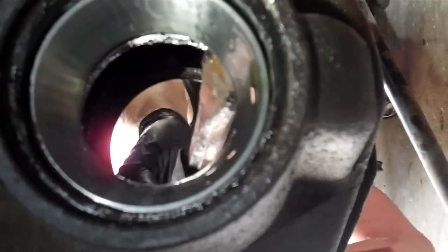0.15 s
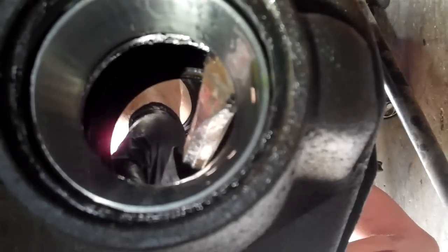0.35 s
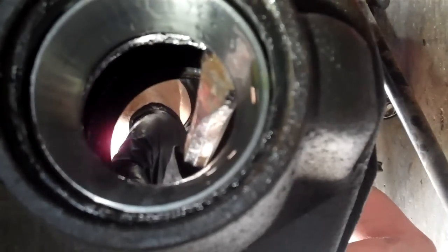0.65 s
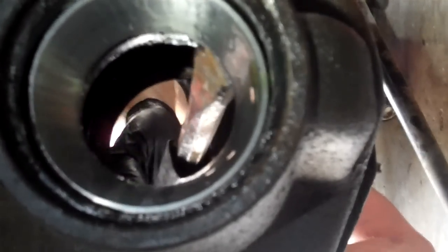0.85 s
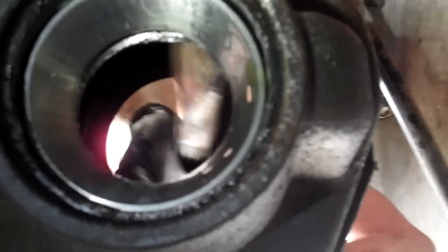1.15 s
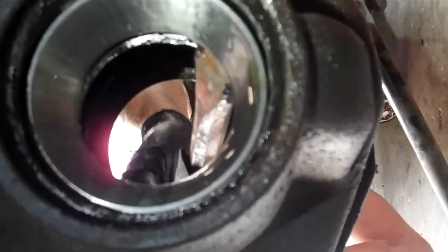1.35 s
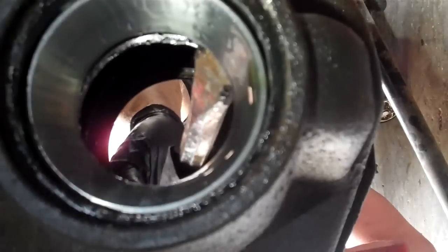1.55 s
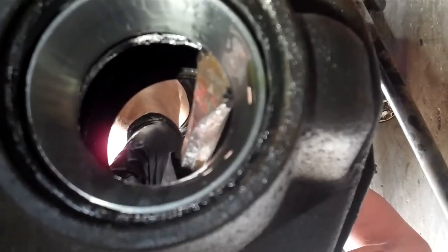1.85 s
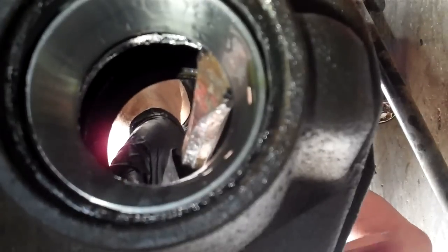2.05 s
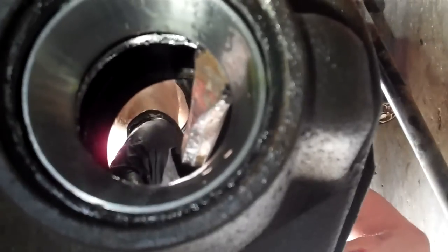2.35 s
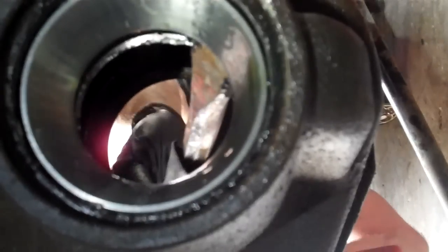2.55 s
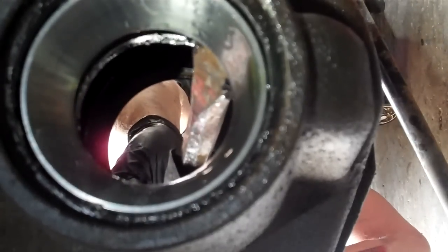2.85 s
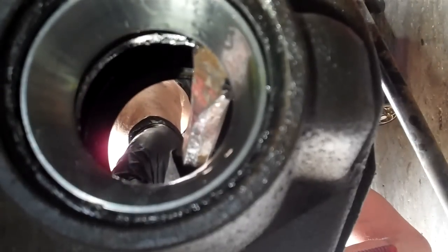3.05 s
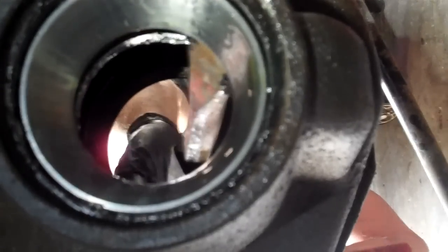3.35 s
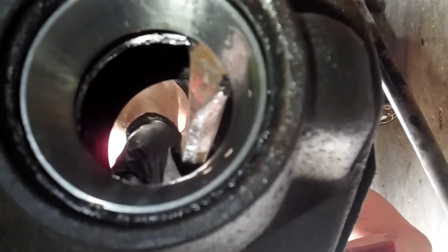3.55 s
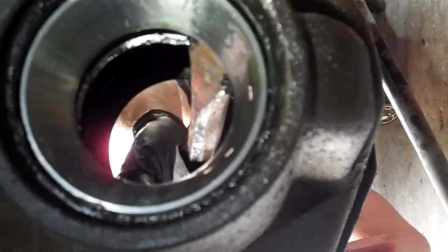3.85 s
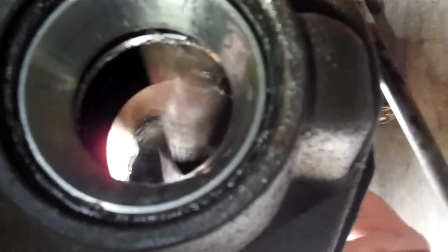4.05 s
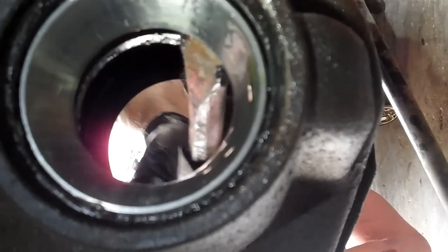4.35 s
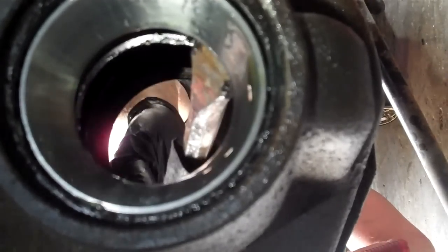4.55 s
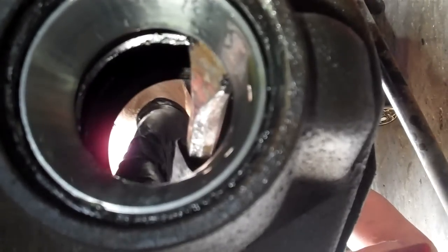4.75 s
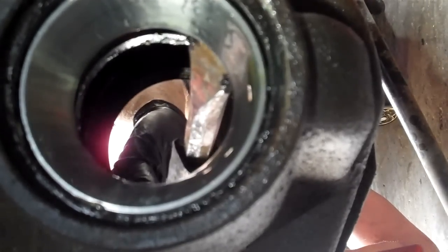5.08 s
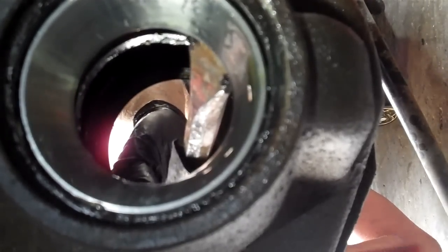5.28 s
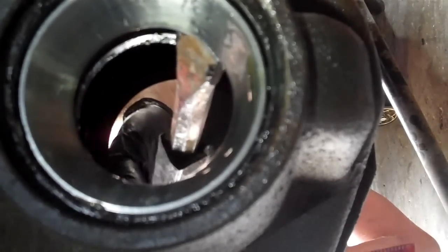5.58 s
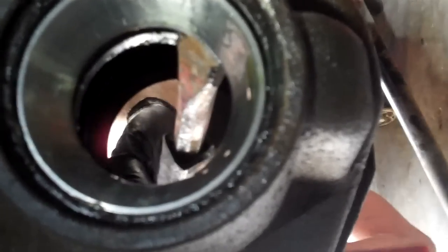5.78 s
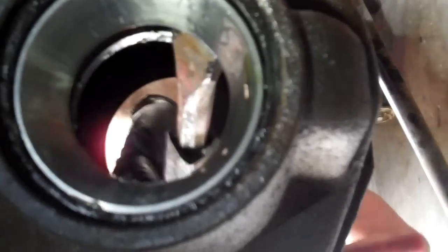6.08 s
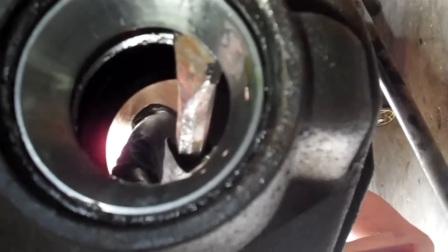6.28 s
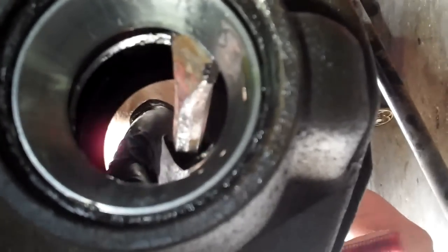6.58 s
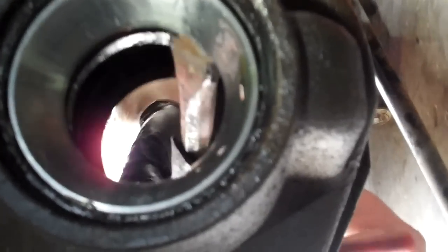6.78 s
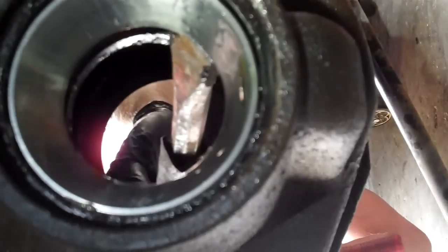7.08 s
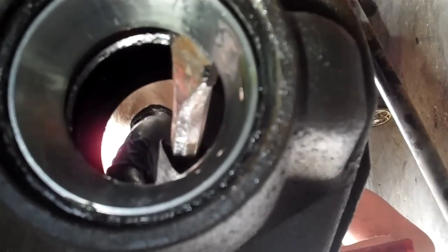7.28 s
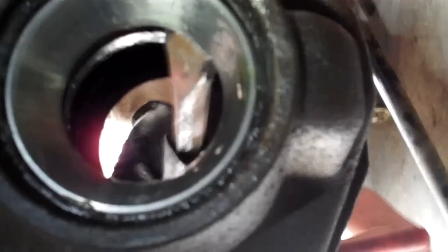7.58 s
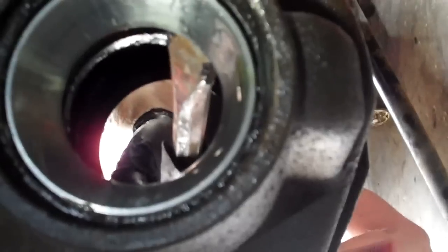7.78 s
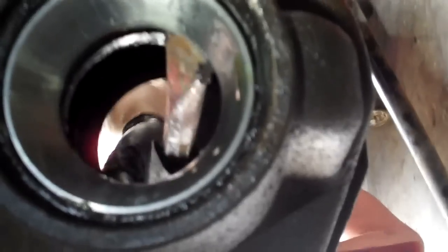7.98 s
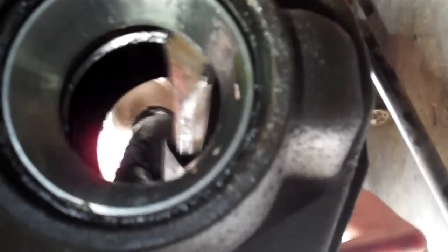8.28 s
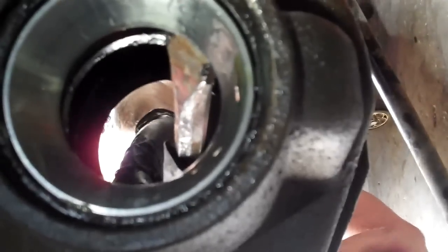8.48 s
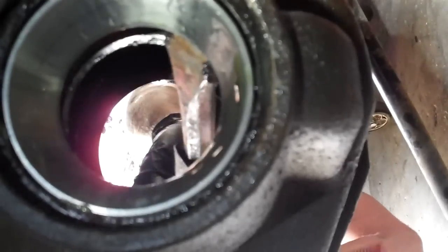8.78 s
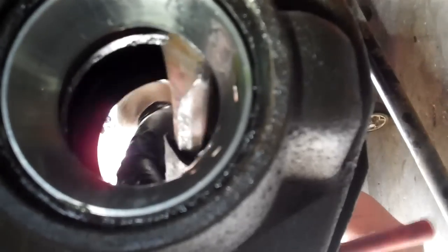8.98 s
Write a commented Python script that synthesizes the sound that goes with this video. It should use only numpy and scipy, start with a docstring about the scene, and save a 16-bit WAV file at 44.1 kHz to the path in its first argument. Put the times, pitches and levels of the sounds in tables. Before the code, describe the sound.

Close in a garage workshop, a hammer strikes a steel chisel. Four moderate, gradually weakening clanks fall at 0.1, 0.5, 0.9 and 1.2 s. A faint rub at 1.6 and a lighter hit at 1.8 lead to a huge overloaded clash at 2.2 and a weaker one at 2.55. From about 3.1 to 3.4 the tool scrapes with short low, creaky squeaks, then blows land at 3.4, 3.75 and a more ringing one at 4.1. Small taps and a short scrape tick at 4.5 to 4.75. A fierce run starts at 5.45, fading through 5.8, 6.1, 6.5 and 6.8. A soft rubbing stroke swells near 7.4; the hardest blow hits at 7.65, then 7.95, a tiny tap at 8.15, and 8.3, 8.6 and 9.0. Blows are bright, dense and clipped, with short rings, low thumps and booming rumble; a very faint thin whine joins after 8.75.

```python
"""A garage workshop: a hammer strikes a long steel chisel in short runs of blows, close to the microphone.
Each blow is a dense clash made of noise bands that die away one by one, over the ringing modes of the bar
and of the part under it. Between runs the tool is shifted: filtered noise scrapes, light blows tap and
gliding tones squeak. Low rumble, rustle and a thin whine lie behind. Hard blows overload the microphone:
their peaks are flattened and a low thump is added."""
import sys
import numpy as np
from scipy import signal
from scipy.fft import rfft, irfft
from scipy.io import wavfile
from scipy.ndimage import uniform_filter1d

SR = 44100
rng = np.random.default_rng(int(sys.argv[2]) if len(sys.argv) > 2 else 0)


def wav_out(sig):
    """Save sig, one row per channel (or a flat mono array), as 16-bit PCM at SR to the path in sys.argv[1]."""
    wavfile.write(sys.argv[1], SR, np.round(np.clip(np.atleast_2d(sig).T, -1, 1) * 32767).astype(np.int16))


N = 402633

# Blows and light taps; the three rings are levels against the clash:
# (time [s], clash [dB], brightness [dB per octave], low bar ring [dB], high bar ring [dB],
#  seat ring [dB], overload thump [dB])
BLOWS = [(0.113, -6.5, 2.5, -19, -17, -12, -17), (0.503, -8.5, 2, -15.5, -18.5, -17, -34),
         (0.863, -10.5, 2, -17.5, -24.5, -14.5, -35.5), (1.203, -11, 1.5, -26, -13.5, -11.5, -39.5),
         (1.781, -16, 1.7, -22, -10, -13, -57), (2.183, 10.5, 2.5, -18, -24.5, -19, -9.5),
         (2.553, -2, 4, -13, -10, -19.5, -7.5), (3.401, 7.5, 2.5, -17, -20, -13.5, -11),
         (3.748, 5, 3, -21.5, -16.5, -13, -8), (4.125, -6.5, 0.8, -7.5, -8, -11.5, -28),
         (4.482, -65, -1, -11, -23, -11.5, -70), (4.508, -65, -2.5, -14, 2, -2, -70),
         (4.723, -36, -1, -12.5, -3, -7.5, -55), (4.745, -45.5, -3.5, -16, -16, -24, -60),
         (5.455, 12, 2.5, -15, -21, -20, -8.5), (5.801, 3.5, 3, -18.5, -21, -17.5, -11.5),
         (6.123, -3.5, 2, -13.5, -31, -20.5, -14), (6.461, -8.5, 1.4, -15, -26.5, -14, -32),
         (6.772, -9.5, 1.35, -18.5, -20, -17, -28.5), (7.644, 12.5, 2, -23, -19.5, -17.5, -7.5),
         (7.974, 5.5, 2.1, -11.5, -19.5, -17.5, -8), (8.148, -40.5, 1.5, -8, -25, -9.5, -48),
         (8.275, -60.5, 1.5, -18.5, -17.5, -19, -71), (8.325, -1, 3, -20.5, -29.5, -47, -13.5),
         (8.633, -4.5, 2.5, -12.5, -37, -20, -21), (9.02, -10.5, 2.5, -12.5, -9.5, -13.5, -41)]
# Background that rises between runs and sinks through each run: (time [s], rustle [dB], rumble [dB])
BACKGROUND = [(0, -60.5, -59), (.3, -68, -69), (1.3, -75, -79), (1.74, -70, -73), (1.84, -48, -54),
              (2.1, -54.5, -59), (2.6, -65, -64.5), (3.14, -73.5, -75.5), (3.2, -56, -74.5),
              (3.45, -55.5, -56), (4.1, -64, -60.5), (4.68, -70, -75), (4.78, -55, -68), (5.45, -53, -64.5),
              (6.1, -66.5, -61.5), (7.3, -69.5, -75), (7.45, -50.5, -75), (7.7, -48, -52.5),
              (8.3, -65, -59.5), (9.13, -64, -73)]


def amp(db):
    """Turn decibels into a plain factor."""
    return 10 ** (np.asarray(db) / 20)


def rms_one(x):
    """Scale a signal to an average strength (RMS) of 1."""
    return x / np.sqrt(np.mean(x ** 2) + 1e-20)


def in_time(rows, outside=None):
    """Draw straight lines between the rows of a time table: one curve per column."""
    times, *columns = np.transpose(rows)
    t = np.arange(N) / SR
    return [np.interp(t, times, column, outside, outside) for column in columns]


def at_hz(points, hz):
    """Read a frequency table at any pitch, with frequency on a log scale."""
    table_hz, values = np.array(points).T
    return np.interp(np.log(hz), np.log(table_hz), values)


def follows(rule):
    """Give each blow a level that follows the strength of its clash."""
    start_db, db_per_clash_db = rule
    return start_db + db_per_clash_db * np.array(BLOWS)[:, 1]


def strikes(level_db):
    """Place one click per blow, over a floor too small to hear."""
    clicks = np.full(N, 1e-18)
    clicks[(np.array(BLOWS)[:, 0] * SR).astype(int)] = amp(level_db)
    return clicks


def dying(clicks, t60):
    """Jump up at each click, then fall 60 dB in t60 seconds."""
    return signal.lfilter([1], [1, -amp(-60 / (t60 * SR))], clicks)


def smoothed(x, seconds):
    """Follow a signal with a delay, so that jumps become gentle climbs."""
    keep = np.exp(-1 / (SR * seconds))
    return signal.lfilter([1 - keep], [1, -keep], x)


def ring(drive, hz, t60):
    """Ring like one mode of a solid body: a unit click starts a dying sine of height 1."""
    radius = amp(-60 / (t60 * SR))
    angle = 2 * np.pi * hz / SR
    return signal.lfilter([0, np.sin(angle)], [1, -2 * radius * np.cos(angle), radius ** 2], drive)


def swell(s, rise_s, hold_s, fall_s, level_db):
    """Climb 30 dB to the level reached at s, hold it, then fall 30 dB; silent outside."""
    corners = np.cumsum([s - rise_s, rise_s, hold_s, fall_s])
    levels = level_db - np.array([30, 0, 0, 30])
    return amp(in_time(list(zip(corners, levels)), outside=-200)[0])


def waver():
    """Wander smoothly at random, with an average strength of 1."""
    size = int(.012 * SR)  # averaged twice over 12 ms
    once = uniform_filter1d(rng.standard_normal(N), size)
    return rms_one(uniform_filter1d(once, size))


def port_noise(crowd_db=0):
    """Make noise as two close microphone ports hear it: most alike in the low range, unlike in the treble."""
    # how alike left and right are: (frequency [Hz], likeness [0 to 1])
    likeness = [(60, 0.29), (180, 1), (540, 0.94), (1620, 0.74), (4840, 0.33), (14500, 0.012)]
    # how much stronger left is than right: (frequency [Hz], level [dB])
    sides = [(60, 1), (180, 1), (540, 2), (1620, 1), (4840, 1), (14500, -4)]
    hz = np.maximum(np.arange(N // 2 + 1) * SR / N, 10)
    left, other = rfft(rng.standard_normal((2, N)))
    alike = np.clip(at_hz(likeness, hz), 0, 1)
    right = alike * left + np.sqrt(1 - alike ** 2) * other
    tilt = amp(at_hz(sides, hz) / 2)
    # countless small resonances roughen the colour, less so below 1200 Hz
    spacing_hz = 30
    knots = np.arange(0, SR / 2 + spacing_hz, spacing_hz)
    bumps = np.interp(hz, knots, rng.standard_normal(len(knots)))
    crowd = rms_one(amp(crowd_db * np.minimum(hz / 1200, 1) * bumps))
    return irfft(crowd * np.array([left * tilt, right / tilt]), N)


def rumble():
    """Low noise of the building and the bench; each blow sets it booming."""
    # boom of each blow: (level at a 0 dB clash [dB], change per dB of clash [dB])
    boom_rule = (-44, 1)
    boom_t60_s, boom_rise_s = 0.58, .04
    band = signal.butter(3, [48, 150], "band", fs=SR, output="sos")
    boom = smoothed(dying(strikes(follows(boom_rule)), boom_t60_s), boom_rise_s)
    steady = amp(in_time(BACKGROUND)[1])
    return np.hypot(steady, boom) * rms_one(signal.sosfilt(band, port_noise()))


def whine():
    """A thin whine: a few steady sines share one changing level."""
    # loudness over time: (time [s], level [dB])
    whine_level = [(8.75, -68.5), (8.848, -77), (8.972, -76), (8.992, -66.5), (9.02, -71)]
    # its tones, levels counted against each other: (frequency [Hz], level [dB])
    whine_lines = [(4086, -75.5), (6137, -77.5), (8188, -79)]
    t = np.arange(N) / SR
    lines = sum(amp(level_db) * np.sin(2 * np.pi * hz * t) for hz, level_db in whine_lines)
    return amp(in_time(whine_level, outside=-200)[0]) * rms_one(lines)


def squeak(s, length, first_hz, last_hz, level_db):
    """Surfaces stick and slip: a gliding, wavering tone with a weak octave, faded in and out."""
    fade_s, octave_db = 0.011, -12
    waver_share, waver_db = .02, 4  # wobble in pitch [share of the pitch] and in level [dB]
    hz, = in_time([(s, first_hz), (s + length, last_hz)])
    phase = 2 * np.pi * np.cumsum(hz * (1 + waver_share * waver())) / SR
    gain = swell(s, fade_s, length, fade_s, level_db) * amp(waver_db * waver())
    tone = np.sin(phase) + amp(octave_db) * np.sin(2 * phase)
    return np.sqrt(2) * gain * tone


def rub(stroke, peaks):
    """Dry rubbing: friction noise sounds through a few resonances."""
    noise = port_noise()
    body = 0
    for hz, width, level_db in peaks:
        resonance = rms_one(signal.lfilter(*signal.iirpeak(hz, hz / width, SR), noise))
        body = body + amp(level_db) * np.sqrt(width) * resonance
    return swell(*stroke) * rms_one(body)


def overload_thump():
    """Each blow brings a one-sided low thump that relaxes, as from an overloaded microphone."""
    t60_s, low_hz, high_hz = .1, 12, 220
    side_db = 3  # the thump is stronger on the left
    push = dying(strikes(np.array(BLOWS)[:, -1]), t60_s)
    band = signal.butter(1, [low_hz, high_hz], "band", fs=SR, output="sos")
    return amp([[side_db / 2], [-side_db / 2]]) * signal.sosfilt(band, push)


def steel():
    """Each blow sets the modes ringing with new strengths; rattling and scraping keep feeding them."""
    # ringing modes, body 0 bench, 1 bar low, 2 bar high, 3 seat and hammer:
    # (frequency [Hz], level [dB], time to fall 60 dB [s], body [number])
    modes = [(311, -6, .13, 0), (556, -17, .09, 0), (1071, -19, .09, 0), (1520, -9, .18, 1),
             (1630, -9, .19, 1), (1871, -13, .11, 3), (2062, -12, .15, 3), (2248, -11, .12, 3),
             (2412, -11, .12, 3), (2570, -10, .11, 3), (2735, -12, .1, 3), (2905, -11, .11, 3),
             (3162, -5, .14, 2), (3237, -10, .1, 2), (3467, -12, .1, 3), (3563, -12, .1, 3),
             (3812, -11, .12, 3), (4130, -10, .12, 3), (4379, -12, .11, 3), (4825, -13, .1, 3),
             (5287, -14, .11, 3), (5971, -14, .09, 3), (6385, -17, .08, 3), (6803, -19, .08, 3)]
    # how many times longer the twin rings, one entry per body: (length [times])
    twin_longer = [1.0, 2.45, 2.8, 2.7]
    # bench knock of each blow: (level at a 0 dB clash [dB], change per dB of clash [dB])
    bench_rule = (-19.5, .7)
    chatter_db, chatter_s = -18.5, .12  # the chisel rattles in its seat after a blow and roughens the ring
    scrape_db = -35  # share of the rustle that rubs into the steel
    bench_build_s = .095  # the bench takes up the blow slowly, so its knock swells
    twin_hz, twin_db = 11, -20  # typical distance and strength of the twin
    s, clash_db, bright, low_db, high_db, seat_db = np.transpose(BLOWS)[:6]
    ring_db = [follows(bench_rule) - clash_db, low_db, high_db, seat_db]
    noise = port_noise()
    scrape = amp(in_time(BACKGROUND)[0] + scrape_db) * noise
    strengths = 2 * rng.standard_normal((len(s), len(modes)))  # dB
    split = twin_hz * rng.uniform(.5, 1.5, len(modes))
    out = np.zeros((2, N))
    for k, (hz, level_db, t60, body) in enumerate(modes):
        clicks = strikes(clash_db + ring_db[body] + strengths[:, k])
        if body == 0:
            drive = clicks + scrape
            for stage in range(2):
                drive = ring(drive, hz, bench_build_s) * 20 / (bench_build_s * SR)
        else:
            chatter = amp(chatter_db) * dying(clicks, chatter_s) * noise
            drive = clicks + chatter + scrape
        # a bar bends two ways: a close, weaker twin beats with each mode; its left and right are swapped
        twin = amp(twin_db) * ring(drive[::-1], hz + split[k], t60 * twin_longer[body])
        out += amp(level_db) * (ring(drive, hz, t60) + twin)
    return out


def clash_and_rustle():
    """Each blow lifts all third-octave noise bands; they die at a fast and a slow rate over the rustle."""
    # colour of the clash: (frequency [Hz], level [dB per Hz])
    clash_colour = [(24, -50), (40, -18), (181, -15), (329, -7), (1320, -19), (1610, -5), (2390, -9.5),
                    (3220, 3), (3470, -10), (5280, -7), (9820, -24), (13900, -54), (15000, -62.5)]
    # colour of the rustle: (frequency [Hz], level [dB per Hz])
    rustle_colour = [(24, -33.5), (40, 0.5), (65, -0.5), (245, -8), (313, -6), (401, -11.5), (1580, -11),
                     (7770, -26), (11500, -40.5), (14000, -67)]
    # fast dying of the clash: (frequency [Hz], time to fall 60 dB [s])
    clash_t60 = [(60, 0.55), (160, 0.32), (420, 0.17), (1100, 0.16), (2900, 0.076), (7700, 0.097),
                 (14000, 0.11)]
    # slow dying of the tail: (frequency [Hz], time to fall 60 dB [s])
    tail_t60 = [(60, 0.68), (300, .5), (1100, 0.39), (2900, 0.3), (7700, 0.3), (14000, 0.043)]
    # tail of each blow: (level at a 0 dB clash [dB], change per dB of clash [dB])
    tail_rule = (-17.5, .75)
    # left over right of each blow: (level at a 0 dB clash [dB], change per dB of clash [dB])
    pan_rule = (1, -0.067)
    tail_tilt_db = -1  # per octave: the walls return a duller sound
    rustle_bright_db = -0.34  # per octave
    s, clash_db, bright = np.transpose(BLOWS)[:3]
    tail_db = follows(tail_rule) - clash_db
    rustle_db = in_time(BACKGROUND)[0]
    edges = 32 * 2 ** (np.arange(28) / 3)
    centres = np.sqrt(edges[1:] * edges[:-1])

    def share(colour):
        """Level each band so that all bands together have an average strength of 0 dB."""
        colour_db = at_hz(colour, centres)
        power = np.sum(amp(2 * colour_db) * np.diff(edges)) * 2 / SR
        return colour_db - 10 * np.log10(power)

    white = [port_noise(crowd_db=5), port_noise(crowd_db=5)]  # neighbouring bands take turns
    uneven = 1.5 * rng.standard_normal((len(s), len(centres)))  # dB: no two blows have the same colour
    latest_blow = np.maximum(np.searchsorted(s * SR, np.arange(N)) - 1, 0)
    side = amp(np.array([[.5], [-.5]]) * follows(pan_rule)[latest_blow])
    out = 0
    for k, (hz, clash, rustle) in enumerate(zip(centres, share(clash_colour), share(rustle_colour))):
        octaves = np.log2(hz / 2500)
        level = clash_db + clash + bright * octaves + uneven[:, k]
        fast = dying(strikes(level), at_hz(clash_t60, hz))
        slow = dying(strikes(level + tail_db + tail_tilt_db * octaves), at_hz(tail_t60, hz))
        rise_s = max(0.00011, 0.24 / hz)  # lows build up later
        blow = smoothed(np.hypot(fast, slow), rise_s)
        band_filter = signal.butter(2, edges[k:k + 2], "band", fs=SR, output="sos")
        band = signal.sosfilt(band_filter, white[k % 2])
        rustle_gain = amp(rustle_db + rustle + rustle_bright_db * octaves)
        out = out + band * np.hypot(blow * side, rustle_gain)
    return out


def scene():
    """Add up all sources as the two microphone ports hear them."""
    # squeaks: (time [s], length [s], first pitch [Hz], last pitch [Hz], level [dB])
    squeak_notes = [(1.575, 0.012, 527, 525, -66), (3.08, .055, 604, 528, -69.5),
                    (3.158, 0.055, 492, 556, -58), (3.227, 0.047, 531, 543, -49.5),
                    (3.288, 0.056, 404, 420, -43.5), (3.348, 0.072, 488, 500, -45)]
    # rubbing strokes: (time at full level [s], fade-in [s], hold [s], fade-out [s], level [dB])
    strokes = [(1.606, .03, 0.085, 0.1, -63), (3.18, 0.055, 0.32, .01, -56),
               (4.487, .02, 0.031, 0.056, -53.5), (7.444, 0.22, 0.1, .12, -55.5)]
    # resonances of the light stroke: (frequency [Hz], width [Hz], level [dB])
    light_peaks = [(1020, 19, -3), (1360, 140, 2), (2280, 56, -3), (3750, 91, -5), (5030, 84, -11)]
    # resonances of the firm stroke: (frequency [Hz], width [Hz], level [dB])
    firm_peaks = [(820, 90, -4), (1150, 300, -4), (1900, 400, -11), (2500, 300, -10), (4510, 200, -20),
                  (6450, 150, -21), (7840, 240, -22)]
    # resonances of the short stroke: (frequency [Hz], width [Hz], level [dB])
    short_peaks = [(1700, 200, 0), (2620, 100, 3), (3160, 60, 0), (3500, 150, -6), (5270, 200, -12),
                   (5950, 200, -15)]
    # resonances of the long stroke: (frequency [Hz], width [Hz], level [dB])
    long_peaks = [(1550, 79, -19), (2130, 32, -0.5), (2740, 54, -4.5), (3720, 52, 2)]
    squeaks = sum(squeak(*note) for note in squeak_notes)
    rubs = sum(map(rub, strokes, [light_peaks, firm_peaks, short_peaks, long_peaks]))
    return rumble() + whine() + squeaks + rubs + steel() + clash_and_rustle()


def record(dry):
    """Overload the microphone: a fast limiter, flattened peaks, the low thump of overload, a cut top."""
    limit_db, release_db_s, attack_s = 7.5, 503, .0006
    hardness = 24  # higher bends the peaks more suddenly
    loudest_db = 20 * np.log10(np.abs(dry).max(axis=0) + 1e-9)
    over_db = np.maximum(loudest_db - limit_db, 0)
    fall = release_db_s * np.arange(N) / SR
    held_db = np.maximum.accumulate(over_db + fall) - fall  # jumps with a peak, then lets go
    limited = dry * amp(-smoothed(held_db, attack_s))
    squeezed = limited / (1 + np.abs(limited) ** hardness) ** (1 / hardness)
    flattened = np.clip(squeezed + overload_thump(), -1, 1)
    cut = signal.cheby2(10, 26, 15100, fs=SR, output="sos")  # 26 dB down from 15100 Hz
    return signal.sosfilt(cut, .96 * flattened)


dry = scene()
out = record(dry)
wav_out(out)
```